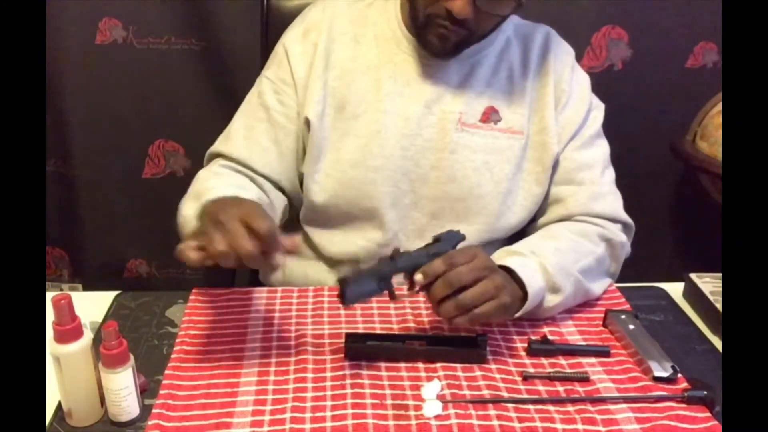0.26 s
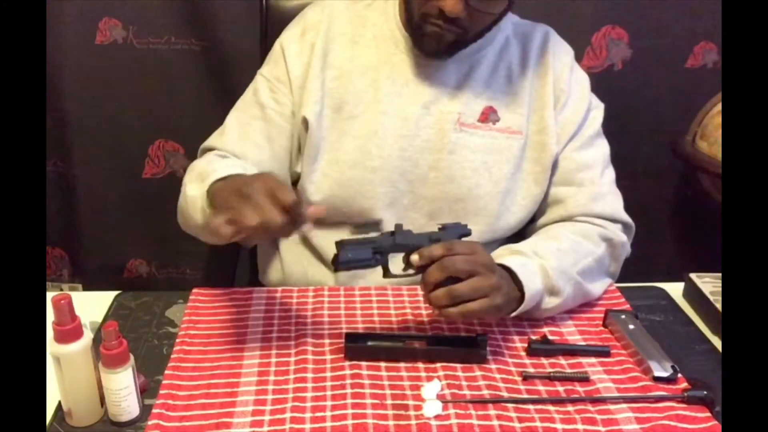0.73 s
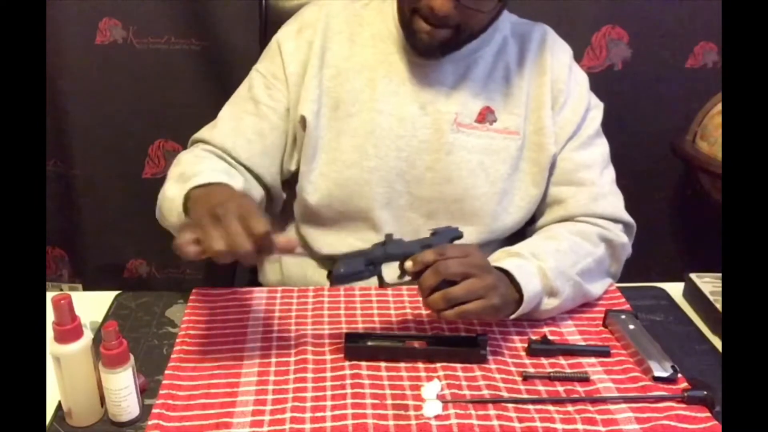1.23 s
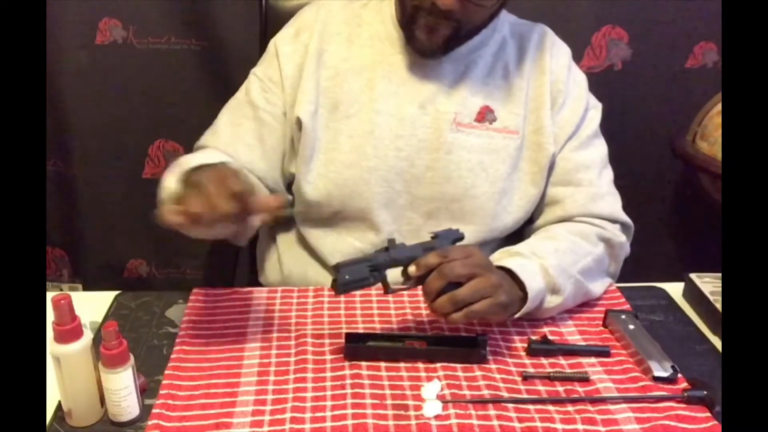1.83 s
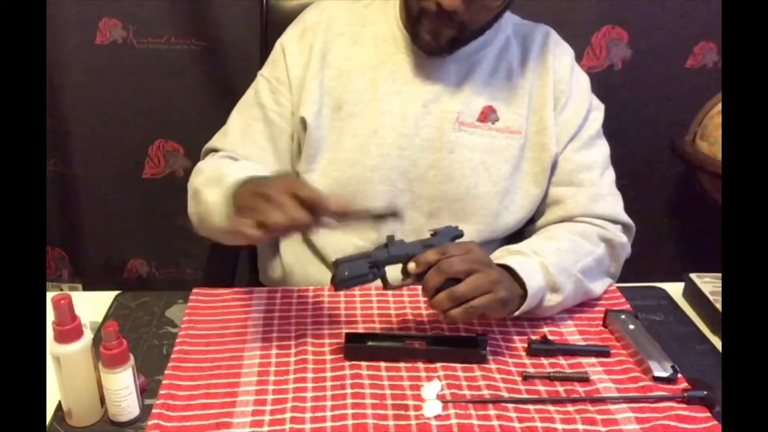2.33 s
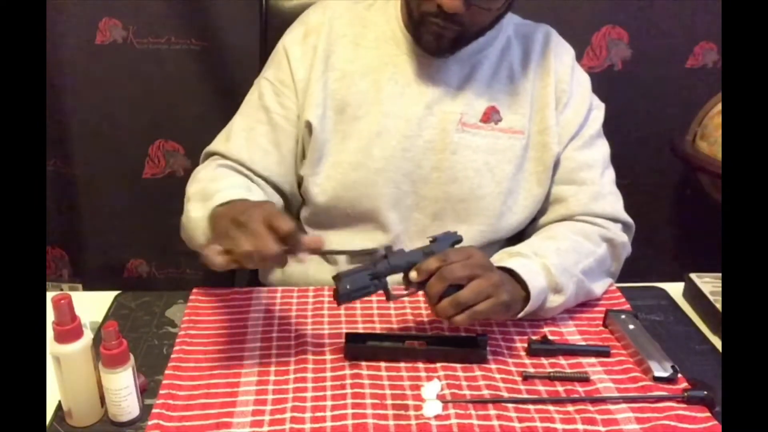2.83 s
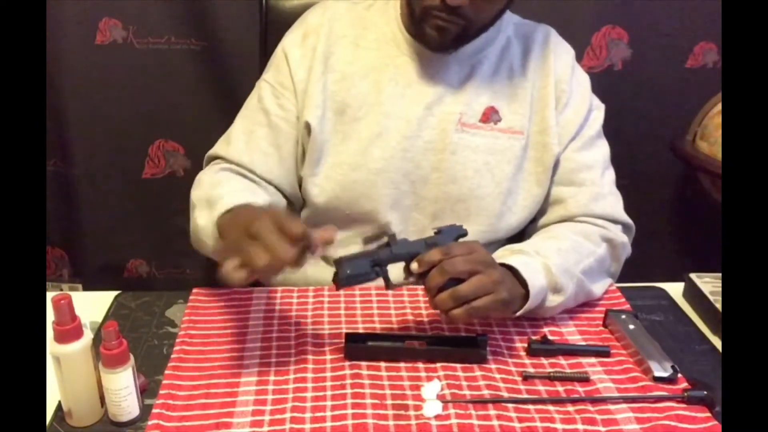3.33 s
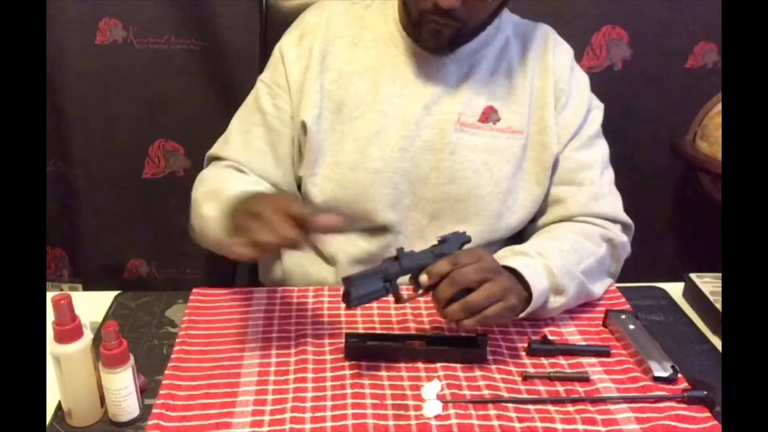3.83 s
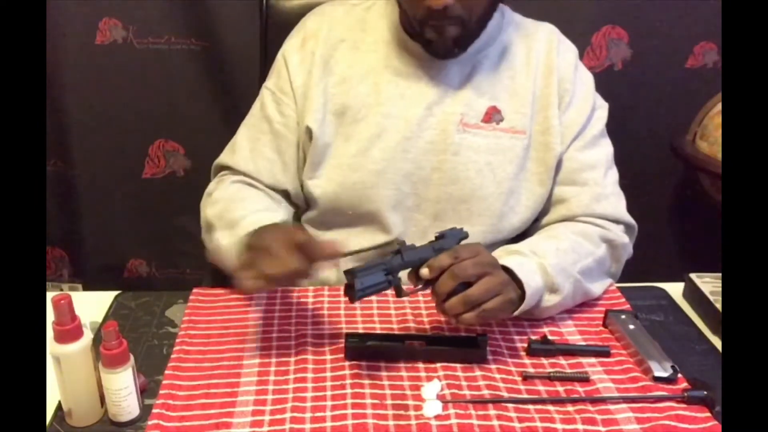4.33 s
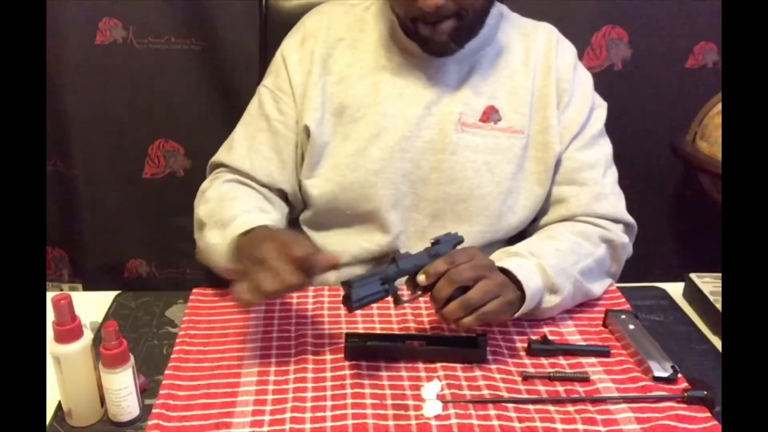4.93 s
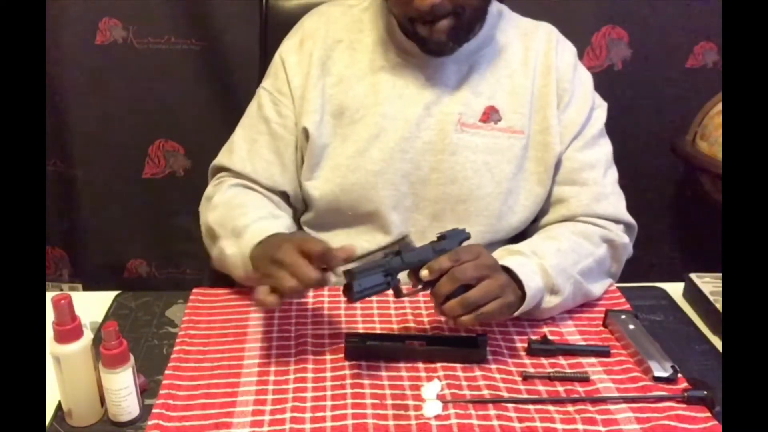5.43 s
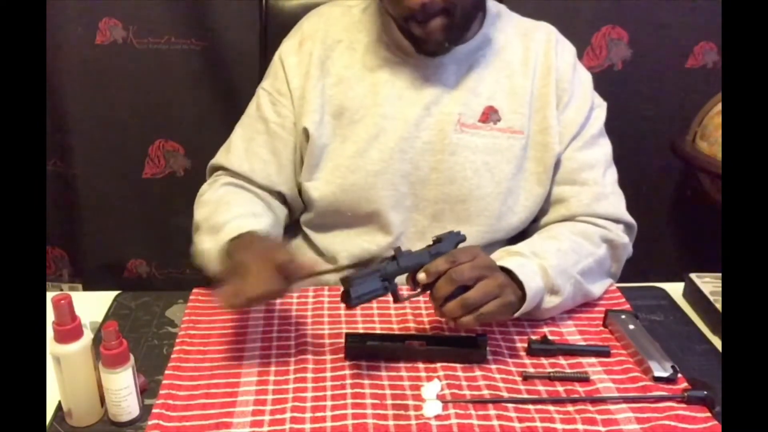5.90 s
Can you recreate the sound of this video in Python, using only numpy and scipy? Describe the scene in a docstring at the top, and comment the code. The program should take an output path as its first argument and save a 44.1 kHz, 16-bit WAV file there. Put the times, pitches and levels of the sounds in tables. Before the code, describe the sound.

Close in a small room, a stiff brush sweeps over a hand-held metal gun frame in short, dry rasping strokes. Light ticks and dull knocks accompany them, with a hard metallic snap before one second and a sharper one after two. Past four seconds the brush scrubs quickly back and forth, then returns to separate strokes. A faint steady low appliance hum lies underneath.

```python
"""A stiff brush scrubs a pistol frame held over a table in a small room, an appliance humming underneath.
It starts in mid-stroke with single sweeps, taps on the frame and two hard snaps off a steel part, the
second after two seconds; past four seconds comes fast back-and-forth scrubbing, then single sweeps again.
Bristles are showers of coloured impulses, taps are cracks plus decaying frame modes, thuds are short
noise bursts and the hum is a few sines over soft noise; echoes of shaped noise surround the handling."""
import sys
import numpy as np
from scipy import signal
from scipy.fft import rfft, irfft, next_fast_len
from scipy.io import wavfile
from scipy.ndimage import map_coordinates

SR = 44100
rng = np.random.default_rng(int(sys.argv[2]) if len(sys.argv) > 2 else 0)


def unload_wav(signal):
    """Save mono or channel-first audio to the path in sys.argv[1] as 16-bit WAV at rate SR, clipped to [-1, 1]."""
    wavfile.write(
        sys.argv[1],
        SR,
        np.round(np.clip(np.atleast_2d(signal).T, -1, 1) * 32767).astype(np.int16),
    )


N = 271679

# modes of the frame, damped by the hand: (f/Hz, relative level/dB, t60/s)
FRAME_MODES = [(1413, -2, 0.013), (1720, -5, 0.0058), (2573, 0.5, 0.007), (3338, -4, 0.0067),
               (3837, -6, 0.0046), (4510, -7, 0.006), (5300, -1, 0.004)]


def amp(db):
    """Decibels to a linear gain."""
    return 10 ** (np.asarray(db) / 20)


def unit(x):
    """Scale x to rms 1."""
    return x / np.sqrt(np.mean(x ** 2) + 1e-20)


def along(points, hz):
    """Read a curve of (Hz, value) points on a log frequency axis."""
    f, v = np.transpose(points)
    return np.interp(np.log(hz + 1), np.log(f + 1), v)


def wobble(rate):
    """A smooth random curve, rate knots a second."""
    knots = rng.standard_normal(int(N * rate / SR) + 4)
    return map_coordinates(knots, [np.arange(N) * rate / SR])


def coloured(x, spectrum):
    """Filter x by the given spectrum and scale it to rms 1."""
    gain = amp(along(spectrum, np.fft.rfftfreq(len(x), 1 / SR)))
    return unit(irfft(rfft(x) * gain, len(x)))


def noise(spectrum, size):
    """Coloured noise of rms 1."""
    return coloured(rng.standard_normal(next_fast_len(size)), spectrum)[:size]


def burst(x, seconds):
    """Give x the energy of an rms-1 signal of that length."""
    return x / np.linalg.norm(x) * np.sqrt(seconds * SR)


def add(track, s, x):
    """Mix x into the track from time s."""
    part = track[round(s * SR):][:len(x)]
    part += x[:len(part)]


def highpass(x, edge_hz, order):
    """Filter x so that little remains below the edge frequency."""
    return signal.sosfilt(signal.butter(order, edge_hz, "highpass", fs=SR, output="sos"), x)


def resonance(hz, width_hz):
    """Rubbing noise through one resonance, at rms 1."""
    edges_hz = [hz - width_hz / 2, hz + width_hz / 2]
    band = signal.butter(2, edges_hz, "bandpass", fs=SR, output="sos")
    return unit(signal.sosfilt(band, rng.standard_normal(N)))


def appliance():
    """Mains and motor lines, slightly unsteady in level and phase, over a soft rush of air."""
    # hum lines: (f/Hz, rms level/dB)
    hum_lines = [(60, -79.5), (89.6, -70.5), (120, -65), (172.6, -72.5), (180, -62.5), (240, -79)]
    # colour of the air rush: (f/Hz, relative level/dB)
    air_colour = [(20, -31), (35, -14.5), (55, 0), (100, 1), (140, 4.5), (260, -4), (400, -12.5),
                  (800, -17.5), (2000, -20.5), (6000, -24), (15000, -33)]
    t = np.arange(N) / SR
    lines = np.zeros(N)
    for hz, db in hum_lines:
        level = amp(db + 0.17 * wobble(2.47))
        phase = 2 * np.pi * (hz * t + rng.random()) + 0.086 * wobble(15.0)
        lines += level * np.sin(phase)
    # a sine of peak sqrt(2) has rms 1
    return np.sqrt(2) * lines + amp(-65.5) * noise(air_colour, N)


def reflections(build_s):
    """Echoes of energy 1 from table and walls: noise that builds up, then decays at a rate set by frequency."""
    # decay time of the room: (f/Hz, t60/s)
    room_decay = [(200, 0.16), (1500, 0.19), (3500, 0.21), (8000, 0.23), (15000, .18)]
    # colour of the reflections: (f/Hz, relative level/dB)
    echo_colour = [(400, 0), (1400, 0), (2500, -1.5), (3700, 1.93), (5400, -2.6), (7200, 1), (13000, 0.5)]
    hz, t, z = signal.stft(rng.standard_normal(SR // 3), SR, nperseg=256)
    fade_db = along(echo_colour, hz)[:, None] - 60 * t / along(room_decay, hz)[:, None]
    tail = signal.istft(z * amp(fade_db), SR, nperseg=256)[1]
    tail_t = np.arange(len(tail)) / SR
    tail = tail * (1 - np.exp(-(tail_t / build_s) ** 2))
    return tail / np.linalg.norm(tail)


def room(x, wet_db, build_s):
    """Direct sound plus reflections, whose pattern changes as the hands move."""
    wet = np.zeros(N)
    hop = SR // 20  # a new pattern every 50 ms
    for start in range(0, N, hop):
        echoes = signal.fftconvolve(x[start:start + hop], reflections(build_s))
        add(wet, start / SR, echoes)
    return (x + amp(wet_db) * wet) / np.hypot(1, amp(wet_db))


def thuds():
    """Hard pushes knock the frame dully against the hand: short decaying bursts of low noise."""
    # pushes into the hand-held frame: (t/s, level/dB)
    pushes = [(.063, -59), (.789, -51.5), (1.533, -57), (1.963, -54.5), (2.32, -52), (2.686, -56),
              (2.984, -58.5), (3.478, -63.5), (5.239, -65), (6.02, -58)]
    # colour of a thud: (f/Hz, relative level/dB)
    thud_colour = [(100, -40), (230, 0), (400, 2.5), (520, -9), (800, -11.5), (1500, -36.5)]
    track = np.zeros(N)
    t = np.arange(SR // 8) / SR
    fade = amp(-60 * t / 0.0553)
    for s, db in pushes:
        add(track, s, amp(db) * burst(noise(thud_colour, len(t)) * fade, seconds=0.0091))
    return highpass(track, edge_hz=120, order=2)


def chatter():
    """Dragged along an edge, the brush head briefly sings in one resonance."""
    # catches on an edge: (centre t/s, Gaussian width/s, f/Hz, peak level/dB)
    catches = [(0.03, 0.055, 1390, -62.5), (0.983, .012, 3680, -59.5), (2.647, 0.014, 2590, -52),
               (3.015, 0.031, 2250, -65), (3.226, 0.024, 2390, -63), (3.529, 0.019, 2320, -62.5),
               (5.27, .03, 1400, -66.5), (5.44, 0.014, 2420, -58), (5.89, 0.022, 2310, -59)]
    t = np.arange(N) / SR
    track = np.zeros(N)
    for s, length, hz, db in catches:
        swell = np.exp(-.5 * ((t - s) / length) ** 2)
        track += amp(db) * swell * resonance(hz, width_hz=360)
    return track


def crack(size):
    """A hard contact: a click whose frequencies are scattered over a millisecond or so."""
    # colour of the crack: (f/Hz, relative level/dB)
    crack_colour = [(200, -46.5), (800, -37), (1300, -8), (3000, -4.5), (6000, 4), (8000, -0.5),
                    (11000, -2), (16000, -3)]
    bins = size // 2 + 1
    scatter = map_coordinates(rng.standard_normal(24), [np.linspace(0, 23, bins)])
    delay_s = np.abs(.0008 + .00035 * scatter)
    # summing the delay across frequency gives the phase
    phase = -2 * np.pi * np.cumsum(delay_s) * SR / size
    even = irfft(np.exp(1j * phase), size)
    return coloured(even, crack_colour)[:size // 2]


def taps(attack_s):
    """Each strike is a crack and a brief ring; where it lands decides which modes speak."""
    # strikes of the brush head: (t/s, ring level/dB, favoured f/Hz, crack level/dB)
    strikes = [(0.0535, -39.5, 2280, -61), (0.0635, -46.5, 2070, -52), (.0668, -45, 3750, -56),
               (0.312, -61, 3900, -87), (.3727, -55.5, 3440, -59.5), (0.3811, -56, 5500, -51.5),
               (0.387, -52.5, 2420, -64), (.471, -53.5, 3800, -64), (0.5169, -41, 3500, -55.5),
               (.748, -43.5, 3700, -49.5), (.762, -30, 3500, -43), (.788, -26.5, 3750, -35),
               (.79, -25.5, 3570, -34), (.882, -42, 2700, -47.5), (1.0287, -49, 5000, -59),
               (1.1576, -37.5, 4030, -44.5), (1.2293, -52, 3500, -68), (1.373, -38, 2200, -56),
               (1.535, -52, 3600, -42.5), (1.8698, -58.5, 1700, -77), (1.965, -48, 2630, -58.5),
               (2.1603, -60, 2200, -85), (2.2589, -48, 1750, -68), (2.309, -43, 3900, -54),
               (2.313, -41, 3900, -54.5), (2.3253, -20, 4270, -28), (2.5753, -56, 2200, -61.5),
               (2.623, -55, 1500, -70), (2.6861, -46, 3120, -47), (2.762, -46, 2400, -66),
               (2.8955, -60.5, 4400, -65), (3.1717, -54.5, 1790, -65), (3.2003, -53.5, 2700, -52.5),
               (3.4457, -55.5, 3880, -55.5), (3.7716, -60, 2500, -74), (4.0015, -60, 2500, -66),
               (6.0199, -36.7, 2100, -64)]
    spot_fall_db, spot_floor_db = 20, -19  # loss per octave from the favoured f; what all modes still get
    # each dB of ring above hard_db takes widen dB off the loss per octave
    hard_db, widen = -34.5, 0.35
    # every strike also bends the whole frame (lowest mode), as far as the grip allows
    bend_db, bend_max_db = -10.5, -44.5
    track = np.zeros(N)
    t = np.arange(SR // 16) / SR
    onset = 1 - np.exp(-t / attack_s)
    mode_hz = np.array(FRAME_MODES)[:, 0]
    for s, ring_db, spot_hz, crack_db in strikes:
        fall_db = spot_fall_db - widen * max(ring_db - hard_db, 0)
        octaves_away = np.abs(np.log2(mode_hz / spot_hz))
        levels = ring_db + np.maximum(-fall_db * octaves_away, spot_floor_db)
        levels[0] = max(levels[0], min(ring_db + bend_db, bend_max_db))
        for level, (hz, db, t60) in zip(levels, FRAME_MODES):
            grip = 1 + .015 * rng.normal()  # slight detuning
            swing = np.sin(2 * np.pi * (hz * grip * t + rng.random()))
            ring = swing * onset * amp(-60 * t / t60)
            add(track, s, amp(level + db) * burst(ring, seconds=0.0084))
        add(track, s, amp(crack_db) * burst(crack(len(t)), seconds=0.014))
    return highpass(track, edge_hz=990, order=3)


def flicks(spectrum, rate, spread_db, clump_db):
    """Bristles slip one by one, in small clumps: random impulses, rate a second, of uneven size."""
    slips = (rng.random(N) < rate / SR) * rng.standard_normal(N)
    slips = slips / np.sqrt(rate)  # mean power stays even as the rate changes
    uneven_db = spread_db * np.clip(rng.standard_normal(N), -2, 2)
    size = amp(uneven_db + clump_db * wobble(260))
    padded = np.pad(slips * size, (0, next_fast_len(N) - N))
    return coloured(padded, spectrum)[:N]


def scrubbing(count=5):
    """An even run of push-pull cycles that slows a little and presses harder, as (s, length s, dB) strokes."""
    first_period_s, slowing_s = .2, 0.0076  # the second is added to each next cycle
    pull_share = 0.4  # the pull starts this far into the cycle
    length_s = 0.068  # each push or pull
    first_db, growth_db = -53.5, .5  # first level, gain per cycle
    strokes = []
    s = 4.26  # first push
    for k in range(count):
        period = first_period_s + k * slowing_s
        db = first_db + k * growth_db
        strokes += [(s, length_s, db), (s + pull_share * period, length_s, db)]
        s += period
    return strokes


def brush():
    """Each stroke speeds up, then lets go; faster bristles flick more often, hissing and making the frame rasp."""
    # single strokes: (start t/s, length of the push/s, bristle hiss level/dB)
    single_strokes = [(-0.05, 0.11, -48), (0.449, 0.039, -53.5), (0.642, 0.024, -61.5), (.728, .03, -45.5),
                      (.98, 0.075, -50.5), (1.086, 0.059, -55.5), (1.201, 0.079, -52), (1.3, 0.068, -53),
                      (1.419, 0.096, -47.5), (1.897, 0.091, -50), (2.1, 0.038, -77), (2.237, .08, -50),
                      (2.587, 0.089, -52), (2.734, 0.054, -61), (2.935, 0.041, -50), (3.161, 0.084, -54),
                      (3.44, .058, -48.5), (3.778, 0.071, -52), (4.016, 0.07, -55.5), (4.123, 0.085, -55),
                      (5.313, 0.086, -52), (5.468, 0.076, -55.5), (5.588, .057, -49.5), (5.685, 0.097, -52),
                      (5.799, 0.084, -53), (5.895, 0.085, -56), (6.025, 0.14, -56.5)]
    # colour of the bristle hiss: (f/Hz, relative level/dB)
    bristle_colour = [(150, -28.5), (400, -8.5), (900, -12.5), (2000, -10), (5500, -3), (7400, -0.5),
                      (9800, -3), (11500, 0.5), (14000, 2), (16000, -7)]
    # colour of the frame's rasp: (f/Hz, relative level/dB)
    rasp_colour = [(600, -33), (980, -40), (1100, -6.5), (1250, -10.5), (1380, -3.5), (1650, -9),
                   (2050, -2.5), (2300, -2.5), (2900, 0), (3400, 1), (4200, 0.5), (5500, -3.5), (8000, -12)]
    # rasp over the bristle hiss: (t/s, level/dB)
    rasp_balance = [(0, -3.5), (.5, -2), (1.05, 1), (1.55, -0.5), (2.3, -2), (2.7, -2.5), (3.25, -5.5),
                    (3.5, -.3), (3.85, -0.5), (4.2, -2.5), (4.7, -1.5), (6.1, -0.6)]
    release_s = 0.058  # every stroke dies away in this time
    pressure_db = 0.6  # unevenness of the hand's pressure within a stroke
    t = np.arange(N) / SR
    motion, power = np.zeros((2, N))
    for s, length, db in single_strokes + scrubbing():
        speed = np.interp(t, [s, s + length, s + length + release_s], [0, 1, 0])
        motion += speed ** 2
        power += (amp(db) * speed) ** 2
    rate = 4000 + 12000 * motion  # flicks a second
    tips = flicks(bristle_colour, rate, spread_db=2.0, clump_db=5.0)
    broad = flicks(rasp_colour, rate, spread_db=1.5, clump_db=4.5)

    def travel():
        """As the contact travels, each resonance comes and goes."""
        return amp(4 * wobble(20))

    modes = np.zeros(N)
    for hz, db, t60 in FRAME_MODES:
        width_hz = np.log(1000) / np.pi / t60  # bandwidth that goes with the decay time
        modes += amp(db + along(rasp_colour, hz)) * travel() * resonance(hz, width_hz)
    # fainter chatter in all strokes, under the rasp
    judder = unit(travel() * resonance(2290, width_hz=280))
    rasp = amp(-1) * broad + amp(-8.5) * unit(modes) + amp(-15) * judder
    rasp_gain = amp(np.interp(t, *np.transpose(rasp_balance)))
    pressure = amp(pressure_db * wobble(35))
    return np.sqrt(power) * pressure * (tips + rasp_gain * rasp)


def scene():
    """Brush and frame sound in the room, over the hum."""
    handling = brush() + chatter() + taps(attack_s=0.00017) + thuds()
    return (room(handling, wet_db=1.0, build_s=0.0032) + appliance())[None]


def record(dry):
    """The recorder's band limit: a steep lowpass takes away the top treble."""
    band_limit = signal.firwin(301, 16100, fs=SR)  # cutoff in Hz
    return signal.fftconvolve(dry, band_limit[None], mode="same", axes=1)


dry = scene()
out = record(dry)
unload_wav(out)
```